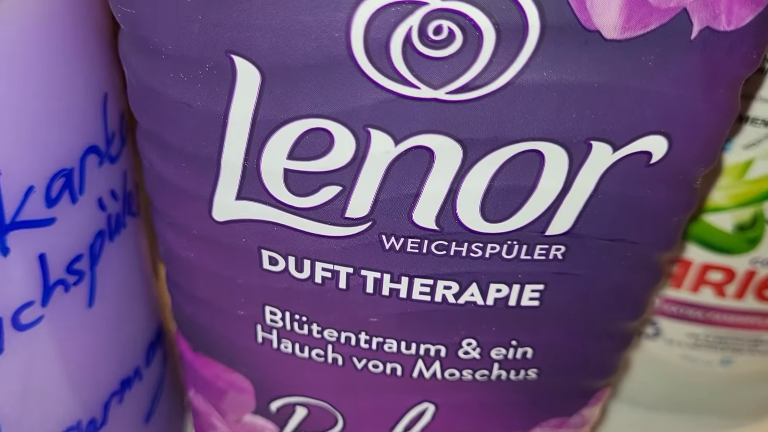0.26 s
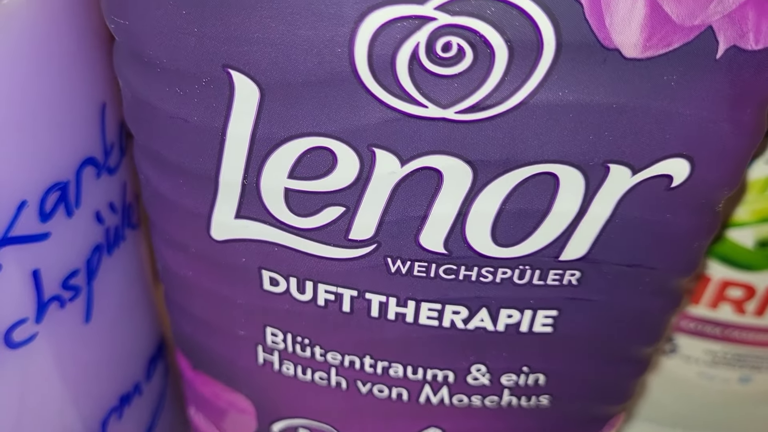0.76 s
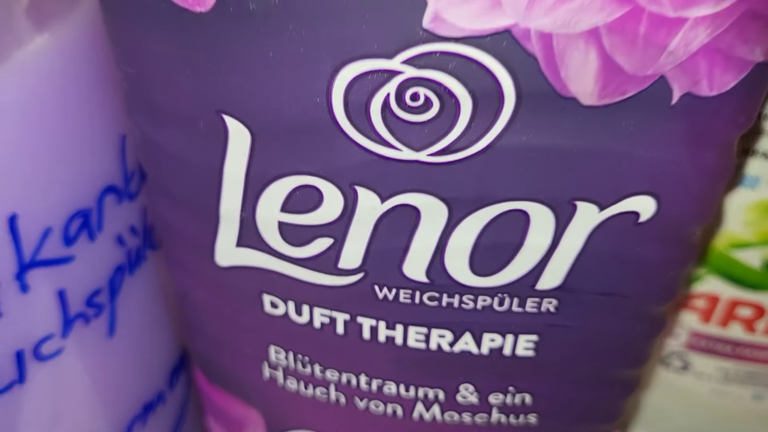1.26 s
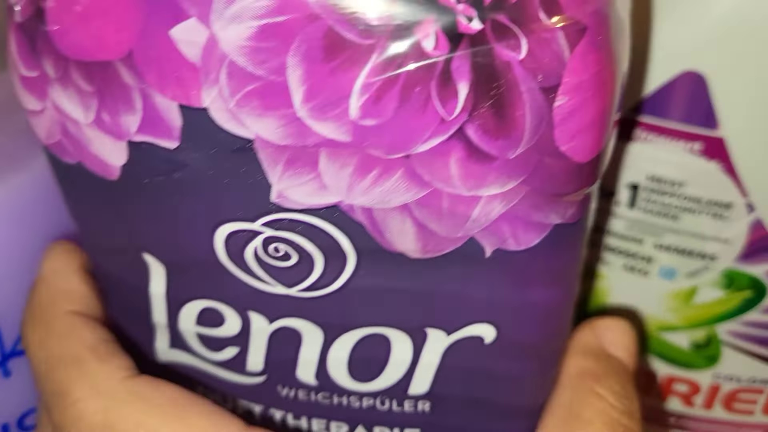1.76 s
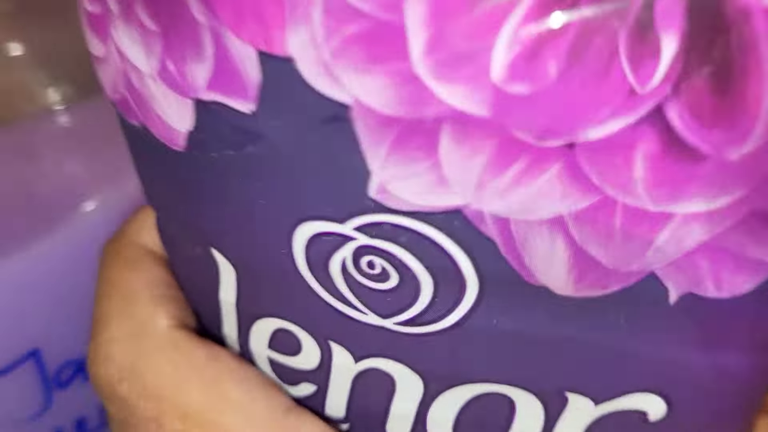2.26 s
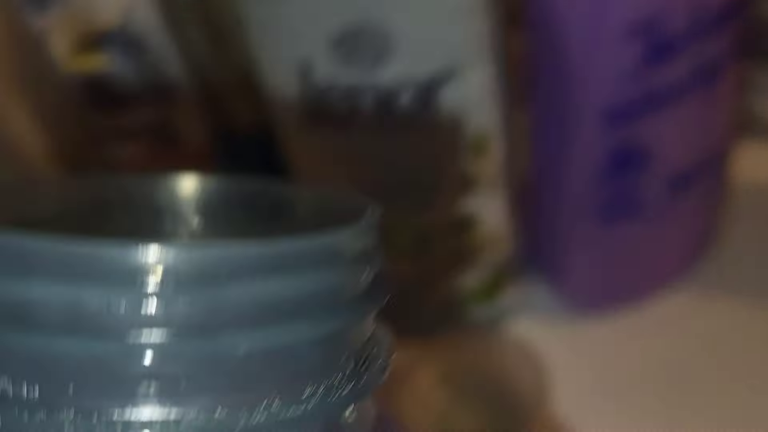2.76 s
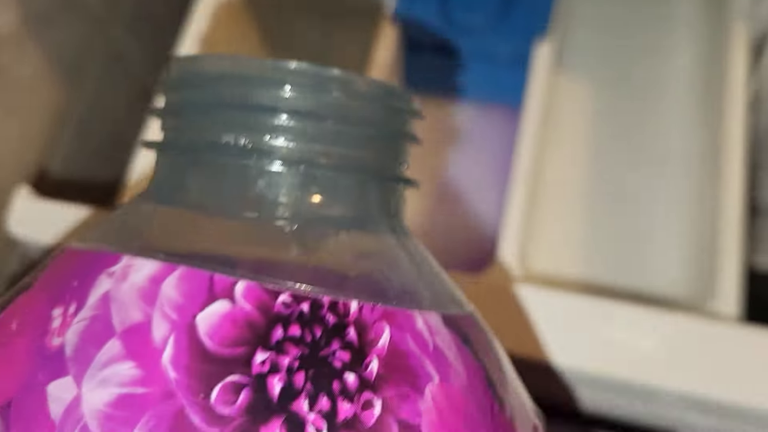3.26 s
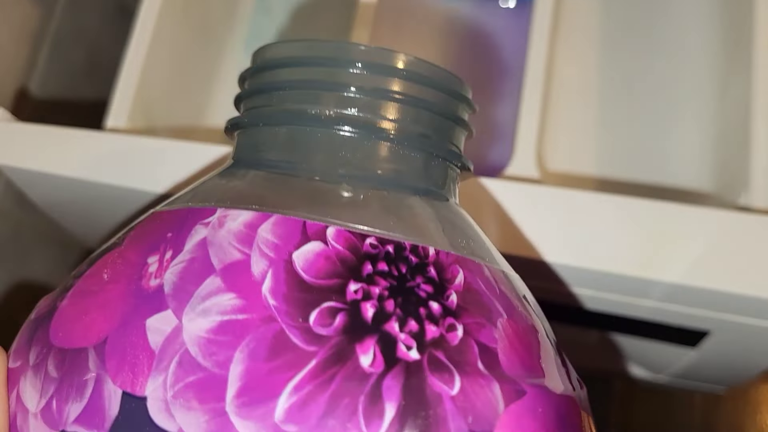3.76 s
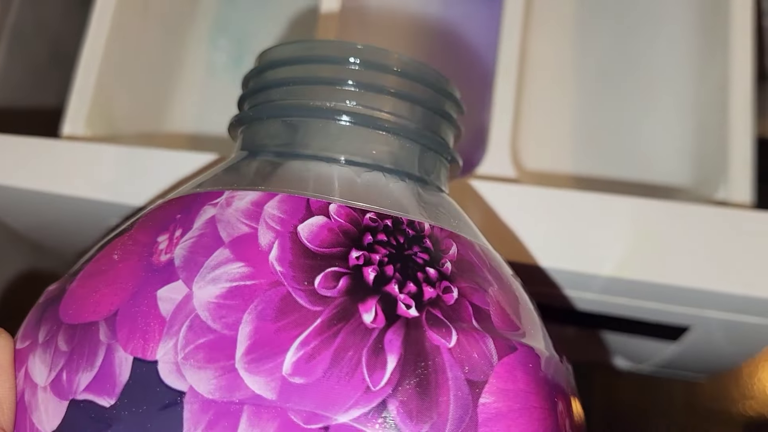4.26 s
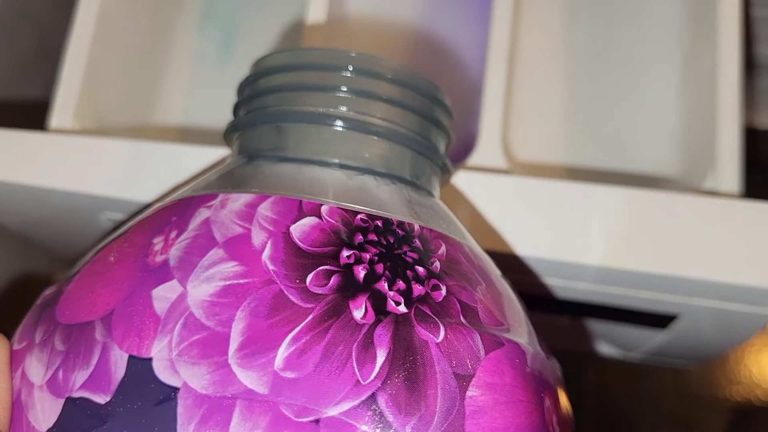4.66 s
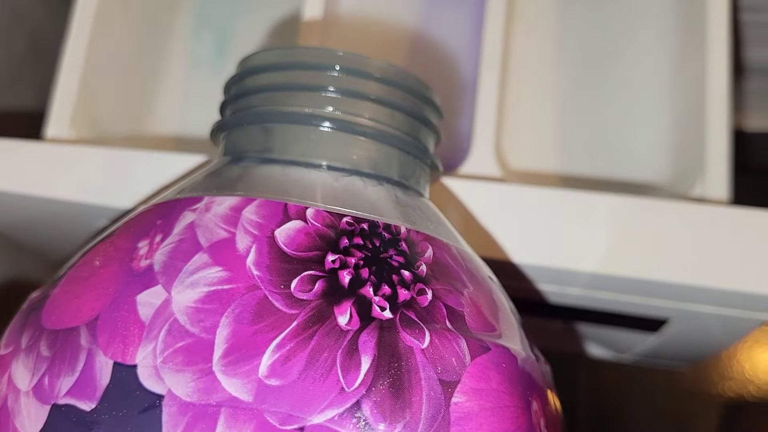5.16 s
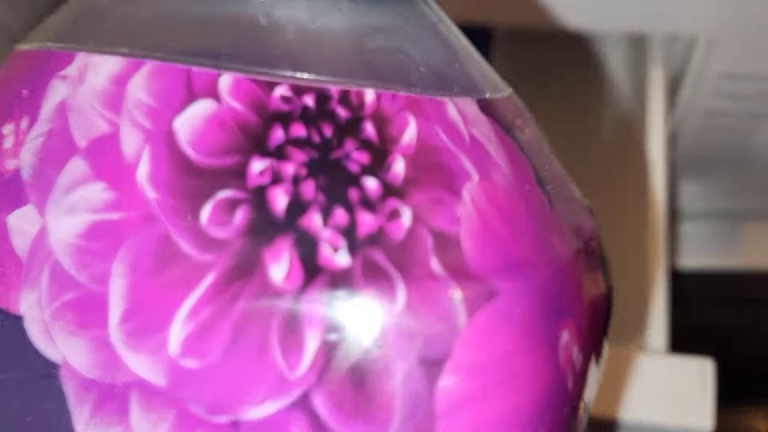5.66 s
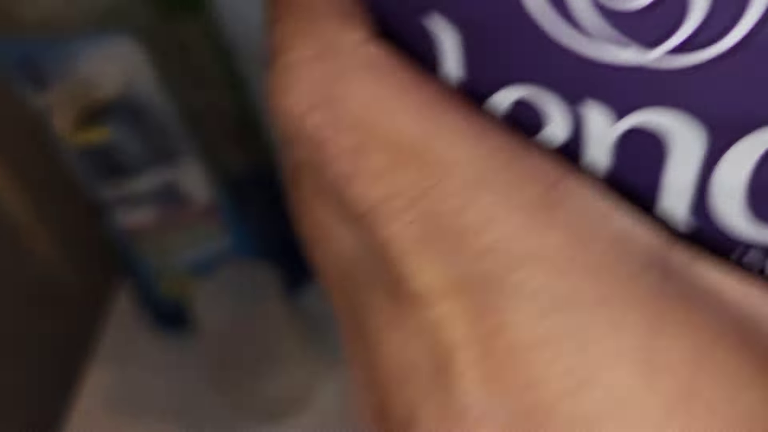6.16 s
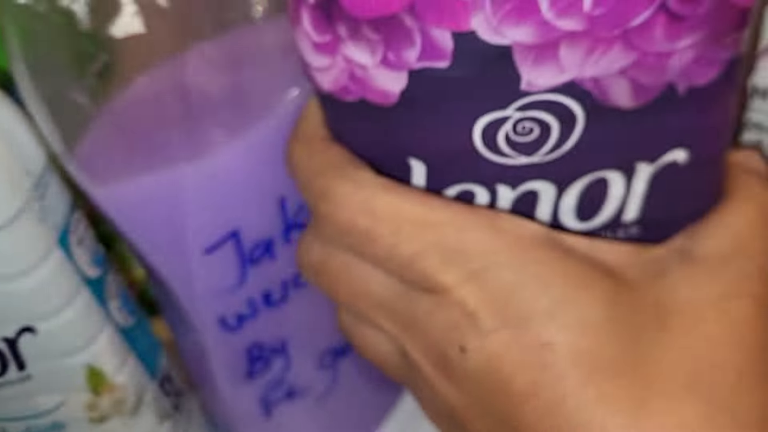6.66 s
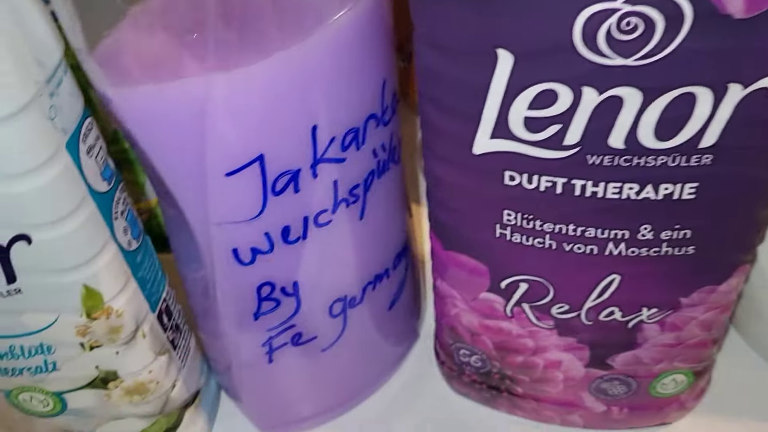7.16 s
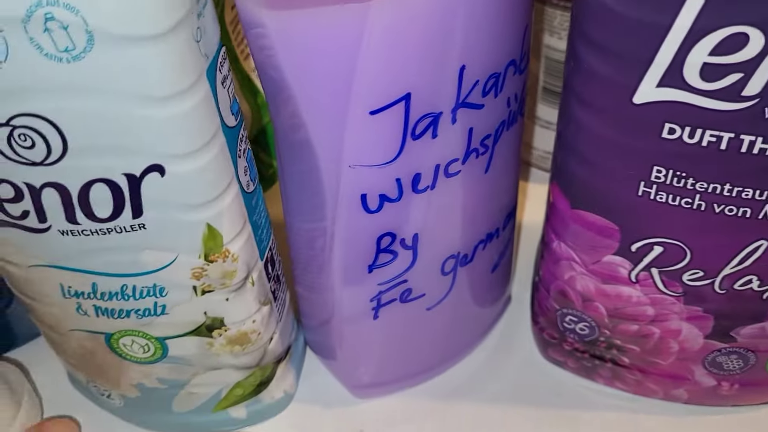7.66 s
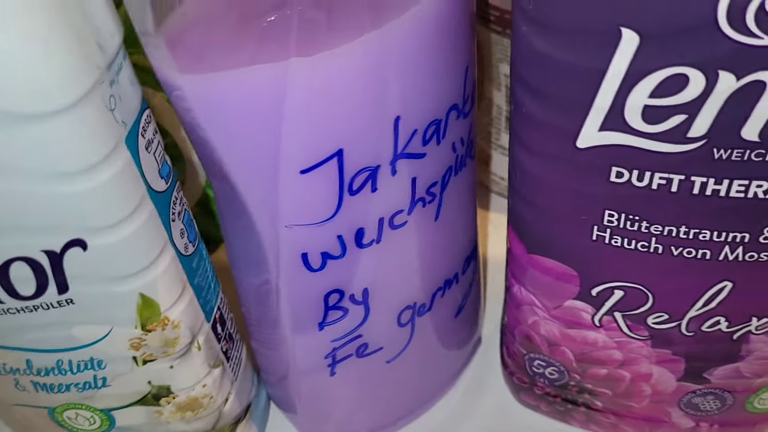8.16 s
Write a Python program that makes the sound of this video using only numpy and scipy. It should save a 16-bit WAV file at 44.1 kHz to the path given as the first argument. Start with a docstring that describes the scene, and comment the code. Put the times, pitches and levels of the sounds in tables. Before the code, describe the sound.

Water drums and bubbles into a plastic drawer, tapers off, then a full plastic bottle rubs, snaps loudly, and is set down with dull bumps.

```python
"""Water runs into the plastic drawer of a washing machine, drumming and bubbling, then tapers off and stops:
many small random impacts ring the walls, pool and tray. Near a full plastic bottle close to the phone, fingers
then rub a sleeve (gritty noise), and the bottle's wall pops out with a loud snap (a brief burst and ringing).
Soft thuds, light knocks, squeaks and lapping follow in the small room, made of shaped noise and fading tones.
Later the bottle is bumped down and slid back on its shelf, then a knock, soft thuds and ticks follow. A low
mains hum, made of sine waves, runs underneath throughout."""
import sys
import numpy as np
from scipy import signal
from scipy.fft import rfft, irfft, next_fast_len
from scipy.io import wavfile
from scipy.ndimage import uniform_filter1d

SR = 44100
rng = np.random.default_rng(int(sys.argv[2]) if len(sys.argv) > 2 else 0)


def output_pcm(signal):
    """Save a mono or channel-first signal as 16-bit PCM at the path in sys.argv[1].

    Samples are clipped to [-1, 1] before scaling.
    """
    pcm = np.clip(np.atleast_2d(signal).T, -1, 1) * 32767
    wavfile.write(sys.argv[1], SR, np.round(pcm).astype(np.int16))


N = 371322
TIME = np.arange(N) / SR
PORT_LAG_S = 0.00032  # the right port hears nearby sounds this much later
STOPS_S = 1.92  # the water has stopped by this time


def amp(db):
    """Turn decibels into a gain."""
    return 10 ** (np.asarray(db) / 20)


def unit(x):
    """Scale to an rms (average strength) of 1."""
    return x / np.sqrt(np.mean(x ** 2) + 1e-20)


def add(track, s, sound):
    """Mix a sound into a track at time s."""
    i = max(int(s * SR), 0)
    track[..., i:i + sound.shape[-1]] += sound[..., :max(N - i, 0)]


def colour(x, points, size=4096):
    """Filter whose gain follows (pitch [Hz], level [dB]) points, without sounding ahead of its input."""
    hz, db = np.transpose(points)
    grid = np.maximum(np.fft.rfftfreq(size, 1 / SR), 1)
    gain = amp(np.interp(np.log(grid), np.log(np.maximum(hz, 1)), db))
    # folding the cepstrum (the spectrum of the log gain) gives the earliest possible response
    cepstrum = irfft(np.log(gain))
    cepstrum[1:size // 2] *= 2
    cepstrum[size // 2 + 1:] = 0
    response = irfft(np.exp(rfft(cepstrum)))
    filtered = signal.oaconvolve(x, np.array(response, ndmin=x.ndim), axes=-1)
    return filtered[..., :x.shape[-1]]


def band(x, lo_hz, hi_hz, order=2):
    """Keep the pitches between two edges."""
    return signal.sosfilt(signal.butter(order, [lo_hz, hi_hz], "band", fs=SR, output="sos"), x)


def resonate(x, modes):
    """Drive (pitch [Hz], width [Hz], level [dB]) resonances side by side; rms 1."""
    total = np.zeros_like(x)
    for k, (hz, width, db) in enumerate(modes):
        # neighbouring resonances push in opposite directions
        total += (-1) ** k * amp(db) * band(x, hz - width / 2, hz + width / 2, order=1)
    return unit(total)


def fade(t, t60):
    """Exponential decay, 60 dB down after t60 seconds."""
    return np.exp(-np.log(1000) * t / t60)


def swell(t, rise_s, hold_s, t60):
    """Envelope that rises from t = 0 and starts to die away at hold_s."""
    return np.clip(t / rise_s, 0, 1) * fade(np.maximum(t - hold_s, 0), t60)


def ring(t, modes, pitch):
    """Free ringing of (pitch [Hz], level [dB], decay t60 [s]) modes, all shifted by a factor; peak 1."""
    y = np.zeros(len(t))
    for k, (hz, db, t60) in enumerate(modes):
        y += (-1) ** k * amp(db) * fade(t, t60) * np.sin(2 * np.pi * hz * pitch * t)
    return y / np.abs(y).max()


def walk(rate):
    """Smooth random wander through rate random points a second."""
    knots = rng.standard_normal(4096)
    return 0.97 * np.interp(TIME * rate, np.arange(len(knots)), knots)


def ports(pair, lag_s, apart_hz=750):
    """Two unrelated signals as a diffuse sound at the two ports: alike in the bass, unrelated in the treble."""
    f = np.fft.rfftfreq(pair.shape[1], 1 / SR)
    alike = .98 * np.exp(-(f / apart_hz) ** 3)
    mid, side = rfft(pair) * np.sqrt([(1 + alike) / 2, (1 - alike) / 2])
    late = np.exp(-2j * np.pi * f * lag_s)
    return irfft([mid + side, (mid - side) * late], pair.shape[1])


def room(x, wet_db, lag_s):
    """Direct sound, left port first, plus a small tiled room in which the bass lingers."""
    treble_t60, bass_t60 = 0.32, 0.51  # s
    t = np.arange(SR // 2) / SR
    tail = ports(rng.standard_normal((2, len(t))), lag_s=0)
    bass = band(tail, 19, 1000)
    tail = bass * fade(t, bass_t60) + (tail - bass) * fade(t, treble_t60)
    tail *= np.clip(t / 0.001 - .4, 0, 1)  # echoes start just after the direct sound
    response = amp(wet_db) * unit(tail) / np.sqrt(len(t))
    response[0, 0] += 1
    response[1, int(lag_s * SR)] += 1
    return signal.fftconvolve(x[None], response, axes=1)[:, :N] / np.sqrt(1 + amp(wet_db) ** 2)


def shade(pair):
    """The phone's body favours one port or the other, depending on pitch."""
    # (pitch [Hz], left minus right level [dB])
    lean = [(60, 7.5), (110, 1.5), (200, 1.5), (380, -3), (700, 3.5), (1290, 2.5), (2380, -2), (4400, -8),
            (8120, -1), (15000, -1.5)]
    left = colour(pair[0], [(hz, db / 2) for hz, db in lean])
    right = colour(pair[1], [(hz, -db / 2) for hz, db in lean])
    return np.array([left, right])


def specks(rate, spread_db):
    """Tiny impacts at random moments, a few much larger than the rest, at both ports; rms 1."""
    shape = (2, next_fast_len(N, True))
    sizes = rng.standard_normal(shape) * amp(spread_db * np.minimum(rng.exponential(size=shape), 5))
    hits = rng.random(shape) < rate / SR
    return unit(ports(hits * sizes, PORT_LAG_S)[:, :N])


def shimmer(pair, depth_db, rate, lo_hz=500, hi_hz=9000, count=18):
    """Neighbouring bands swell and sink each on its own, so that the colour keeps shifting; rms 1."""
    size = next_fast_len(N, True)
    log_hz = np.log(np.fft.rfftfreq(size, 1 / SR) + 1)
    place = np.interp(log_hz, np.log([lo_hz, hi_hz]), [0, count - 1])
    spectrum = rfft(pair, size)
    total = np.zeros((2, N))
    for k in range(count):
        share = np.maximum(1 - np.abs(place - k), 0)  # overlapping triangular bands
        part = irfft(spectrum * share, size)[:, :N]
        total += part * amp(depth_db * walk(rate * rng.uniform(.7, 1.3)))
    return unit(total)


def flow():
    """How far the stream has opened, and how much of it is left as it tapers off smoothly; both 0-1."""
    opens_s, opening_s, taper_s = -0.077, 0.32, 0.56  # it began to open just before time 0
    opened = 1 - np.exp(-np.maximum(TIME - opens_s, 0) / opening_s)
    closing = np.clip((STOPS_S - TIME) / taper_s, 0, 1)
    return opened, np.sin(closing * np.pi / 2) ** 2


def stream(wall_db=-8, pool_db=-5.5, wall_damping=0.47, splutter_db=0.7, chatter_db=2,
           tray_growth=0.52, fizz_db=-16, fizz_flicker_db=3.5):
    """Droplets and heavier slugs ring the drawer; the rising pool damps its walls; the tray drums below."""
    # colour of the splashing: (pitch [Hz], relative level [dB])
    splash_colour = [(260, -28.5), (450, -3.5), (538, -13.5), (866, -7), (947, -5.5), (1150, -9.5),
                     (1550, -11.5), (1850, -7), (2090, -9), (2980, -6.5), (6370, -8), (7070, -3),
                     (8970, -20), (13000, -19), (15800, -17.5)]
    # the drawer's thin walls: (pitch [Hz], width [Hz], relative level [dB])
    wall_modes = [(764, 13.5, 9.5), (797, 17, -4), (869, 31, 7.5), (1854, 36, 6)]
    # the hollow above the pool, coming in as it fills: (pitch [Hz], width [Hz], relative level [dB])
    pool_modes = [(1065, 35, 2), (1150, 82, -6), (1404, 110, 0), (1860, 60, -3), (2420, 34, -12),
                  (2950, 71, 7.5), (3100, 120, -1.5), (3880, 57, 5.5), (4910, 56, 1.5), (5800, 92, 5),
                  (7480, 120, -0.5)]
    # the tray under the stream: (pitch [Hz], width [Hz], relative level [dB])
    tray_modes = [(97, 52, -8.5), (148, 7.9, -2.5), (192.6, 26.6, -4.5), (248.3, 11.2, 2),
                  (294, 27.7, -1.5)]
    # heavier slugs of water landing, relative to the stream: (time [s], spray [dB], drumming [dB])
    slugs = [(.336, -1, -12), (0.467, -3, -12), (0.491, -1, 0), (0.541, -17, 2), (.575, -11, 5),
             (.711, -15, -16), (0.75, -21, 7), (0.811, -3, -2), (0.937, -17, 8), (1.001, -1.5, -12),
             (1.037, -8, -13), (1.097, -8, -2), (1.216, -5, -8), (1.256, -12, 15.5), (1.354, -8, -11),
             (1.427, -21, -9)]
    slug_t60, fills_s, filling_s = 0.083, 0.7, 0.58  # s
    splash_db, tray_db = -35.5, -38.5

    opened, left = flow()
    filled = np.clip((TIME - fills_s) / filling_s, 0, 1)
    t = np.arange(SR // 4) / SR
    surge = np.ones((2, N))
    for s, spray_db, drum_db in slugs:
        add(surge, s, amp([[spray_db], [drum_db]]) * fade(t, slug_t60))
    spray, drum = surge

    drops = specks(rate=5000, spread_db=0.5) * amp(splutter_db * walk(45.6))
    splash = shimmer(colour(drops, splash_colour), depth_db=2.2, rate=45) * spray
    walls = resonate(drops * drum * amp(chatter_db * walk(21.63)), wall_modes)
    walls *= amp(wall_db) * (1 - wall_damping * filled)
    pool = resonate(drops * amp(chatter_db * walk(34.7)), pool_modes)
    pool *= amp(pool_db) * filled * spray
    fizz = unit(band(specks(rate=2500, spread_db=1), 8500, 15500))
    fizz *= amp(fizz_db + fizz_flicker_db * walk(50)) * spray
    tray = unit(band(resonate(drops, tray_modes), 62, 370))
    drawer = (splash + walls + pool + fizz) * amp(splash_db) * opened * left
    # a power below 1 lets even a weak flow drum on the tray
    return shade(drawer + tray * amp(tray_db) * left ** tray_growth)


def bubbles(small_db=-42, spread_db=8, count=900):
    """Trapped air rings and rises a little in pitch; small bubbles follow the flow, shriller ones die sooner."""
    # the loudest bubbles: (time [s], peak level [dB], starting pitch [Hz])
    loudest = [(.338, -23.5, 4470), (.491, -29, 937), (.540, -26, 842), (.63, -33, 3470),
               (0.711, -23.5, 5360), (0.751, -27, 1796), (0.909, -29, 1130), (.940, -25, 844),
               (1.004, -29, 1135), (1.067, -30, 1145), (1.097, -31, 3800), (1.194, -28.5, 1270),
               (1.222, -30, 2970), (1.388, -28, 1134), (1.428, -27.5, 2820), (1.576, -33, 2910)]
    life_s, glide = .055, .1  # decay t60 of a 1000 Hz bubble; rate of the upward glide
    t = np.arange(SR // 10) / SR
    opened, left = flow()
    moment, size, strength = rng.random((count, 3)).T
    s = moment * STOPS_S
    flow_db = 20 * np.log10(np.interp(s, TIME, opened * left) + 1e-6)
    pitch = 900 * 8 ** np.sqrt(size)  # Hz, mostly shrill
    small = np.c_[s, flow_db + small_db + spread_db * strength ** 3, pitch]
    out = np.zeros(N)
    for s, db, hz in np.vstack([loudest, small]):
        t60 = life_s * np.sqrt(1000 / hz)
        tone = np.sin(2 * np.pi * hz * t * (1 + glide * np.minimum(t / t60, 1)))
        add(out, s, amp(db) * fade(t, t60) * tone)
    return shade(room(out, wet_db=-10, lag_s=PORT_LAG_S))


def rustle(surge_db=0.75):
    """Cloth and hands move softly: noise in uneven surges of shifting colour."""
    # course of the rustle before its surges: (time [s], level [dB])
    course = [(1.8, -61), (3.25, -57), (3.5, -64), (3.75, -70), (3.9, -53), (4.18, -74), (4.3, -52),
              (4.75, -60), (5.1, -55.5), (5.4, -60.5), (5.6, -57), (6.2, -54.5), (6.45, -58), (7.1, -56.5),
              (7.6, -58.5), (8.3, -61.5)]
    # its colour: (pitch [Hz], relative level [dB])
    cloth_colour = [(80, -7), (160, 0.5), (300, -1), (550, -5), (850, -10), (1100, -17.5), (1600, -19.5),
                    (2500, -26.5), (5000, -35), (10000, -43.5)]
    noise = ports(rng.standard_normal((2, next_fast_len(N, True))), lag_s=0.0002)[:, :N]
    cloth = shimmer(colour(noise, cloth_colour), depth_db=3, rate=24, lo_hz=200, hi_hz=1500, count=8)
    return cloth * amp(np.interp(TIME, *np.transpose(course)) + surge_db * walk(12))


def background(air_db=-53, hum_waver_db=1, hiss_waver_db=0.5, lean_db=1.5):
    """Room rumble, a slightly wavering hum and a faint, uneven hiss, a little louder on the left."""
    # colour of the quiet room: (pitch [Hz], relative level [dB])
    air_colour = [(30, -20.5), (45, -5.5), (65, 3), (100, -8), (160, -11), (230, -17), (550, -23),
                  (1100, -33), (2500, -43), (7000, -44), (10000, -55), (15800, -48.5)]
    # hum lines before wavering and leaning: (pitch [Hz], rms level [dB])
    hum_lines = [(50, -53), (119, -68.5), (157, -62), (191, -66)]
    # course of the faint high hiss before wavering and leaning: (time [s], level [dB])
    hiss_course = [(3.35, -77.5), (3.8, -90), (4.13, -86.5), (4.35, -77.5), (5.15, -77.5), (5.8, -75.5),
                   (6.01, -62), (7.0, -65.5), (7.6, -73), (7.95, -71), (8.2, -71.5), (8.38, -63.5)]
    # colour of the hiss: (pitch [Hz], relative level [dB])
    hiss_colour = [(1200, -12), (2500, -4.5), (5200, -3.5), (7500, -2.5), (9500, -25), (15500, -11.5)]
    noise = ports(rng.standard_normal((2, next_fast_len(N, True))), lag_s=0.0002)[:, :N]
    air = unit(colour(noise, air_colour)) * amp(air_db + .5 * walk(2.5))
    hum = np.zeros(N)
    for hz, db in hum_lines:
        level = amp(db + hum_waver_db * walk(4.4)) * np.sqrt(2)  # rms to peak
        hum += level * np.sin(2 * np.pi * hz * TIME + hz / 300 * walk(5.1))
    hiss = unit(colour(rng.standard_normal((2, N)), hiss_colour))
    hiss *= amp(np.interp(TIME, *np.transpose(hiss_course)) + hiss_waver_db * walk(14))
    return (air + hum + hiss) * amp(np.array([[lean_db], [-lean_db]]) / 2)


def blows(table, modes, crack_colour, crack_t60):
    """Each blow is a dense, brief clack and the ringing of the struck thing."""
    t = np.arange(SR // 2) / SR
    out = np.zeros(N)
    for s, db, crack_db, pitch in table:
        noise = rng.standard_normal(len(t))
        crack = unit(colour(noise, crack_colour)) * fade(t, crack_t60)
        add(out, s, amp(db) * (ring(t, modes, pitch) + amp(crack_db) * crack))
    return out


def bumps(gain_db=4, shelf_db=-8):
    """Dull blows of liquid-filled plastic, each of which sets the shelf ringing."""
    # blows: (time [s], level before gain [dB], relative crack level [dB], pitch factor [-])
    dull_blows = [(.006, -34.5, -5.5, 1.06), (.12, -27, -14, .8), (0.189, -27.5, -23, 0.55),
                  (1.63, -32.5, -10, 0.65), (2.695, -33, -20, 1.09), (6.721, -26.5, -17.5, 0.8),
                  (6.755, -33, -24, 0.86), (6.7995, -24, -24, 1.07), (6.819, -30, -23, 1.45),
                  (6.854, -34, -24, 1.6), (6.885, -32, -23, 1.07), (6.922, -41.5, -15, .9),
                  (7.24, -37, -24, 1.15), (7.755, -37, -16, 1.07)]
    # ringing of the heavy plastic: (pitch before factor [Hz], relative level [dB], decay t60 [s])
    plastic_modes = [(92, -5.5, 0.084), (190, -4, 0.1), (250, 7, 0.051), (315, -10.5, 0.1),
                     (419, -5, 0.039), (729, -18.5, 0.12)]
    # colour of the crack: (pitch [Hz], relative level [dB])
    crack_colour = [(40, -12.5), (75, 6.5), (150, -8), (500, -5), (900, -12.5), (2500, -17), (7000, -28.5),
                    (10000, -51.5)]
    # the shelf, the same under every bump: (pitch before factor [Hz], relative level [dB], decay t60 [s])
    shelf_modes = [(69.4, -1, .45), (192, -2, 0.45), (246, -4.5, .3), (412, -5, .2), (552, -10.5, .18),
                   (630, -23, .35)]
    t = np.arange(SR // 2) / SR
    out = blows(dull_blows, plastic_modes, crack_colour, crack_t60=0.22)
    for s, db, _, _ in dull_blows:
        add(out, s, amp(db + shelf_db) * ring(t, shelf_modes, 0.97))
    return amp(gain_db) * room(out, wet_db=-5, lag_s=PORT_LAG_S)


def ticks(gain_db=1, faint_db=-69, spread_db=7, faint_hz=6500, breadth=1.52, count=12):
    """Small crackles of the plastic: brief, broad clicks, plus fainter random ones while the sleeve is held."""
    # the clearer crackles: (time [s], level before gain [dB], centre pitch [Hz])
    clear = [(0.118, -33, 1700), (1.637, -37, 11000), (2.024, -37, 1840), (2.074, -44, 2220),
             (2.251, -48, 3000), (2.283, -44, 4550), (2.303, -37, 1400), (3.589, -59, 4390),
             (3.672, -63.5, 3600), (4.158, -60, 6940), (4.235, -60, 1995), (4.397, -53, 4030),
             (4.47, -58, 10000), (4.665, -60, 11000), (5.044, -53, 9000), (5.205, -56, 1300),
             (5.243, -69, 6500), (5.291, -53, 4200), (5.464, -46.5, 2780), (5.61, -53, 1500),
             (5.698, -47.5, 7540), (5.721, -53, 2700), (5.866, -48.5, 4470), (6.152, -34.5, 6500),
             (6.236, -48, 3000), (6.362, -49, 6500), (6.727, -46.5, 5000), (6.798, -32.5, 1200),
             (6.818, -46, 4000), (6.884, -42, 3500), (6.971, -26, 1780), (6.974, -43, 3400),
             (7.487, -53.5, 8000), (7.838, -47, 1300), (7.975, -54, 1770), (8.38, -47, 1810)]
    held_s, tick_t60 = (4.2, 7.0), 0.019  # span of the faint crackles (s); decay (s)
    t = np.arange(SR // 4) / SR
    moment, strength, pitch = rng.random((count, 3)).T
    faint_s = np.interp(moment, [0, 1], held_s)
    faint = np.c_[faint_s, faint_db + spread_db * strength, faint_hz * 2 ** (2 * pitch - 1)]
    out = np.zeros(N)
    for s, db, hz in np.vstack([faint, clear]):
        click = unit(band(rng.standard_normal(len(t)), hz / breadth, hz * breadth))
        add(out, s, amp(db + gain_db) * click * fade(t, tick_t60))
    return room(out, wet_db=-8, lag_s=PORT_LAG_S)


def rub(hiss_db=1, sheen_db=1, hollow_db=-4, judder_db=1.5):
    """The sleeve sticks and slips: a fine hiss, a rasp when pressed, a bright sheen, a hollow rumble inside."""
    # strokes of skin or shelf, before the gains above:
    # (time [s], length [s], hiss level [dB], sheen relative to it [dB], rasp relative to it [dB])
    strokes = [(1.658, 0.13, -51, 0.5, -11), (1.773, 0.11, -52, -5.5, -1.5),
               (1.899, 0.035, -48.5, -0.5, -4.5), (1.949, 0.041, -54, -6, -1.5),
               (2.004, 0.078, -52.5, 0.5, -1), (2.088, 0.041, -51.5, -4.5, 0.5), (2.156, 0.37, -60, -3, -2),
               (2.314, 0.08, -46, -3.5, -6.5), (2.425, 0.095, -49, -1.5, -5), (2.543, 0.092, -49, -4.5, -5),
               (2.635, 0.098, -45.5, -1, -9), (2.73, 0.075, -45.5, -4.5, -5.5), (2.83, 0.058, -56, -5, -2),
               (2.906, 0.077, -62, -3.5, 0.5), (3.121, 0.011, -55, 1.5, 2.5), (5.956, 0.2, -49, 0.5, -10.5),
               (6.195, 0.023, -58.5, -6, 0), (6.806, 0.086, -51, -4, 0), (6.918, 0.047, -48.5, -2, -3.5)]
    # colour of the sleeve: (pitch [Hz], relative level [dB])
    sleeve_colour = [(600, -6), (1200, -0.5), (2000, -2.5), (3000, 0.5), (5500, -6.5), (7500, -6.5),
                     (8800, -21.5), (11000, -15.5)]
    # colour of the hollow bottle: (pitch [Hz], relative level [dB])
    hollow_colour = [(50, -7), (80, 10), (150, -9.5), (250, 1.5), (450, -3), (700, -9.5), (1200, -34.5),
                     (2500, -45.5)]
    attack_s, stroke_t60 = 0.015, 0.13
    grit = specks(rate=13000, spread_db=1.0) * amp(judder_db * walk(60))
    sleeve = colour(grit, sleeve_colour)
    hiss = unit(band(sleeve, 4800, 11000, order=3))
    rasp = unit(band(sleeve, 720, 3600, order=3))
    sheen = unit(band(grit, 8200, 15000, order=3))
    hollow = unit(colour(grit, hollow_colour))
    t = np.arange(SR) / SR
    power = np.zeros((3, N))  # overlapping strokes add in power
    for s, length, db, shine_db, press_db in strokes:
        levels = amp([[db], [db + shine_db], [db + press_db]])
        add(power, s, (levels * swell(t, attack_s, length, stroke_t60)) ** 2)
    sliding, shine, pressed = np.sqrt(power)
    slide = sliding * (hiss * amp(hiss_db) + hollow * amp(hollow_db))
    return shade(slide + pressed * rasp + shine * sheen * amp(sheen_db))


def thuds(scuff_db=1, ring_db=-2.5, hollow_db=-1, body_t60=0.32, scuff_t60=0.28, boom_t60=0.46, grain_db=2.5):
    """Soft contacts that swell and die away: a dull body, a scuff on hollow plastic, a longer boom and ring."""
    # soft thuds and shuffles further off, scuff and boom relative to the body and before the gains above:
    # (time [s], body level [dB], rise [s], scuff [dB], boom [dB])
    contacts = [(1.85, -46, 0.09, -12, -1.5), (2.18, -45, 0.068, -14, 0), (2.274, -40.5, 0.009, -13.5, -17),
                (3.125, -50, .01, -18, 1), (3.185, -47.5, .012, -17, -15), (3.23, -52, 0.015, -10, -12),
                (3.359, -53, 0.0079, -11, -7), (3.555, -57, 0.0083, -17, -11), (3.915, -44, 0.074, -13, 0),
                (4.23, -49, 0.014, -10, -2), (4.312, -58, 0.0098, -9, -13), (4.494, -43, 0.019, -17.5, 4),
                (4.856, -43.5, 0.018, -16.5, -2), (5.039, -60, 0.015, -9, -10),
                (5.19, -58, 0.05, -10.5, -10), (5.283, -42, 0.0044, -10.5, -4),
                (5.431, -52, 0.0075, -15, 4.5), (5.458, -39, 0.0063, -11, -4),
                (5.555, -45, 0.019, -13, -6.5), (5.735, -50, 0.02, -12.5, -18),
                (5.819, -51.5, 0.042, -12, 0), (6.09, -42.5, 0.051, -14.5, -5),
                (6.281, -56.5, 0.041, -14, -22), (6.495, -47.5, 0.03, -19, -11),
                (6.56, -41.5, 0.049, -14, 0), (6.692, -40.5, 0.02, -16, -0.5),
                (7.19, -41.5, 0.084, -25, -7), (7.38, -42, 0.047, -18, -8), (7.834, -40, 0.0065, -18.5, -2),
                (7.975, -45, 0.036, -15.5, -8), (8.35, -47.5, 0.038, -18, -13)]
    # colour of a contact: (pitch [Hz], relative level [dB])
    contact_colour = [(70, -9), (190, 2.5), (300, -6), (500, -5), (750, -11), (1100, -13), (1700, -11.5),
                      (2500, -14.5), (3500, -23.5), (7000, -25), (10000, -26)]
    # the hollow plastic that a scuff rings: (pitch [Hz], width [Hz], relative level [dB])
    scuff_modes = [(1153, 32, 4.5), (1492, 32, -4.5), (1710, 40, 6), (2107, 100, -5), (2640, 28, 3),
                   (3440, 130, 7)]
    # low resonances of the room set off by each thud: (pitch [Hz], width [Hz], relative level [dB])
    room_modes = [(189.4, 10, -3), (249.3, 16, 2), (309, 13, 4), (412.7, 15.4, 5.5), (568, 17, -9),
                  (677, 26, -15), (846, 14, -3)]
    t = np.arange(SR // 2) / SR
    out = np.zeros((2, N))
    for s, db, rise, scuff, boom in contacts:
        noise = rng.standard_normal((3, len(t)))
        grain = amp(grain_db * unit(uniform_filter1d(noise[2], size=128)))
        contact = colour(ports(noise[:2], lag_s=0.00013) * grain, contact_colour)
        body = unit(band(contact, 210, 955))
        top = amp(scuff + scuff_db) * unit(band(contact, 2180, 6200))
        top += amp(scuff + hollow_db) * resonate(contact, scuff_modes)
        low = amp(boom) * unit(band(contact, 66, 159)) + amp(ring_db) * resonate(contact, room_modes)
        thud = body * swell(t, rise, rise, body_t60)
        thud += top * swell(t, rise, rise, scuff_t60) + low * swell(t, rise, rise, boom_t60)
        add(out, s, amp(db) * thud)
    return out


def scrapes(attack_s=0.0037, scrape_t60=0.17):
    """Rubs and squeaks: fine friction rings a resonance of the sleeve, whose pitch moves with the grip."""
    # (time [s], length [s], level [dB], first pitch [Hz], last pitch [Hz], width [Hz])
    squeaks = [(2.329, .21, -48, 5620, 5200, 805), (2.341, 0.25, -54.5, 2700, 2860, 500),
               (2.749, 0.057, -53, 2260, 2230, 300), (3.36, .022, -69, 6300, 6000, 1400),
               (3.75, 0.14, -70, 1550, 1394, 300), (5.434, .04, -57, 1560, 1510, 220),
               (5.568, 0.018, -62, 3450, 3450, 260), (5.684, 0.015, -62, 4350, 4650, 900),
               (5.858, .05, -62, 3770, 3870, 120), (5.943, .215, -53, 5470, 2904, 1000),
               (6.555, .012, -52, 1320, 1282, 180), (6.596, .025, -40.5, 579, 576, 90),
               (6.851, .09, -55, 2330, 2430, 600), (7.473, 0.046, -58.5, 15000, 14600, 1500)]
    t = np.arange(SR // 2) / SR
    out = np.zeros((2, N))
    for s, length, db, first_hz, last_hz, width in squeaks:
        hz = first_hz + (last_hz - first_hz) * np.minimum(t / length, 1) ** 3  # glides ever faster
        noise = rng.standard_normal((2, 2, len(t)))
        # slow complex noise, shifted up to the gliding pitch, makes a narrow band around it
        grain = signal.sosfilt(signal.butter(2, width / 2, fs=SR, output="sos"), noise[0] + 1j * noise[1])
        note = unit(np.real(grain * np.exp(2j * np.pi * np.cumsum(hz) / SR)))
        add(out, s, amp(db) * note * swell(t, attack_s, length, scrape_t60))
    return shade(out)


def snap(crack_db=6, ring_db=-21, tail_db=5, echo_s=0.011, echo_db=-8, buckle_t60=0.0026, first_db=5):
    """The dented wall flips out in one crack and rings; the nearest surface echoes it, then the room dies away."""
    # colour of the crack: (pitch [Hz], relative level [dB])
    crack_colour = [(82, -39), (140, -17), (248, -7.5), (450, -9), (655, -24), (798, -17), (1180, -24),
                    (1280, -11.5), (1630, -20.5), (2060, -9.5), (3250, -12.5), (4280, -12), (7450, -15.5),
                    (9080, -33.5), (15800, -49)]
    # ringing of the wall: (pitch before factor [Hz], relative level [dB], decay t60 [s])
    wall_ringing = [(259, -2, 0.26), (298, -6.5, 0.42), (332.4, -8, 0.11), (437, -6.5, 0.36),
                    (1313, -8, .12), (2240, -6.5, 0.24), (4340, -13, 0.18)]
    snap_s, snap_db = 2.9722, -0.18  # time, level before the gains above
    tail_t60, late_db, late_t60 = 0.3, -30, 0.98  # the tail dies fast, then a weak part lingers
    t = np.arange(SR) / SR
    buckle = rng.standard_normal(len(t)) * fade(t, buckle_t60)
    # a buckling wall pushes all pitches equally hard, spread over a few milliseconds
    push = irfft(np.exp(1j * np.angle(rfft(buckle))))
    push = np.roll(push, 8) * fade(t, .1)
    push = push + amp(first_db) * signal.unit_impulse(len(t))  # the first instant is the sharpest
    tail = ports(rng.standard_normal((2, len(t))), lag_s=0)
    tail = tail * (fade(t, tail_t60) + amp(late_db) * fade(t, late_t60)) * np.minimum(t / 0.0057, 1)
    direct = np.array([push, np.roll(push, int(PORT_LAG_S * SR))])
    echo = amp(echo_db) * np.roll(direct, int(echo_s * SR), axis=1)
    paths = direct + echo + amp(tail_db) * unit(tail) / np.sqrt(len(t))
    crack = colour(paths, crack_colour) / np.sqrt(np.sum(colour(push, crack_colour) ** 2))
    out = np.zeros((2, N))
    add(out, snap_s, amp(snap_db) * (amp(crack_db) * crack + amp(ring_db) * ring(t, wall_ringing, 0.95)))
    return shade(out)


def knocks(gain_db=6, click_db=2):
    """Light, hard taps on hollow plastic, each led by the sharp click of first contact."""
    # taps: (time [s], level before gain [dB], relative crack level [dB], pitch factor [-])
    hard_taps = [(4.3972, -39.5, -6.5, 0.8), (5.463, -47, -14, 0.77), (5.481, -51, -8, 0.74),
                 (5.571, -52, -11, .8), (7.7212, -34, -2, 1.0)]
    # ringing of the plastic: (pitch before factor [Hz], relative level [dB], decay t60 [s])
    plastic_modes = [(409, -13, 0.24), (530, -11, 0.33), (660, -9, 0.13), (847, -4.5, 0.11),
                     (1073, 1, 0.11), (1135, 5, 0.04), (1280, -1, 0.073), (1890, -20, 0.12),
                     (2075, -12, 0.14), (2720, -22, 0.15), (3020, -14, 0.034), (3430, -23, .04)]
    # colour of the crack: (pitch [Hz], relative level [dB])
    crack_colour = [(120, -6.5), (280, 6), (700, 2), (1200, 2), (1600, 2), (2000, -2.5), (3000, -7),
                    (7000, -23), (9500, -41), (15500, -50)]
    out = blows(hard_taps, plastic_modes, crack_colour, crack_t60=0.085)
    click = band(signal.unit_impulse(256), 900, 7000, order=1)
    for s, db, _, _ in hard_taps:
        add(out, s, amp(db + click_db) * click / np.abs(click).max())
    return amp(gain_db) * room(out, wet_db=-5, lag_s=0.00018)


def lapping(faint_db=-60, spread_db=9, low_hz=380, octaves=2.0, t60=0.032, count=44):
    """Liquid laps inside the tilted bottle: soft, short blips, the higher ones fainter."""
    lapping_s = (4.85, 5.9)  # span in which the blips start
    t = np.arange(SR // 4) / SR
    out = np.zeros(N)
    for moment, strength, size in rng.random((count, 3)):
        hz = low_hz * 2 ** (octaves * size)
        blip = np.sin(2 * np.pi * hz * t) * swell(t, .003, .003, t60) * np.sqrt(low_hz / hz)
        add(out, np.interp(moment, [0, 1], lapping_s), amp(faint_db + spread_db * strength) * blip)
    return room(out, wet_db=0, lag_s=PORT_LAG_S)


def scene():
    """Everything at the two ports."""
    water = stream() + bubbles()
    surroundings = rustle() + background()
    bottle = bumps() + ticks() + rub() + scrapes() + snap() + knocks() + lapping()
    return water + surroundings + bottle + thuds()


def gain_control(x, attack_s=.06):
    """A loud sound turns the phone's gain down, and it creeps back up."""
    duck_above_db, duck_share, recovery_db_per_s = -25, 0.48, 0.32
    power = uniform_filter1d(np.mean(x ** 2, axis=0), size=441)  # averaged over 10 ms
    level_db = 10 * np.log10(np.abs(power) + 1e-12)
    wanted_db = duck_share * np.maximum(level_db - duck_above_db, 0)
    # hold the deepest duck so far, less the recovery since
    climb = recovery_db_per_s * TIME
    duck_db = np.maximum.accumulate(wanted_db + climb) - climb
    keep = np.exp(-1 / (attack_s * SR))
    return x * amp(-signal.lfilter([1 - keep], [1, -keep], duck_db))


def record(dry):
    """The phone drops the deep bass, turns loud sound down and cuts the top."""
    top_hz = 15850
    dry = signal.sosfilt(signal.butter(4, 34, "high", fs=SR, output="sos"), dry)
    dry = np.clip(gain_control(dry), -1, 1)
    return signal.sosfilt(signal.ellip(10, .2, 70, top_hz, fs=SR, output="sos"), dry)


dry = scene()
out = record(dry)
output_pcm(out)
```